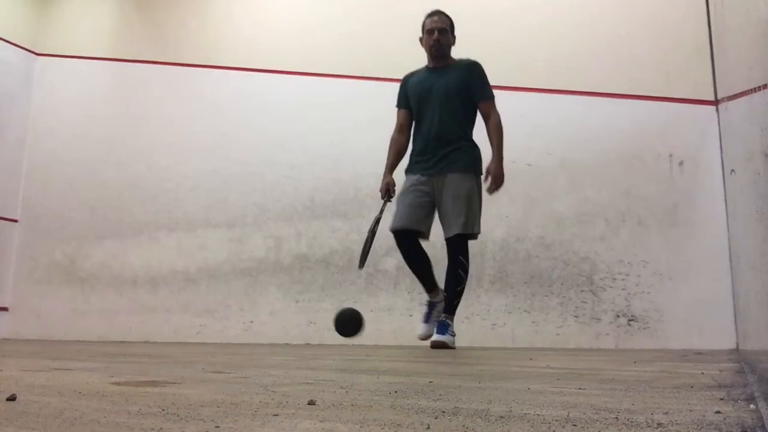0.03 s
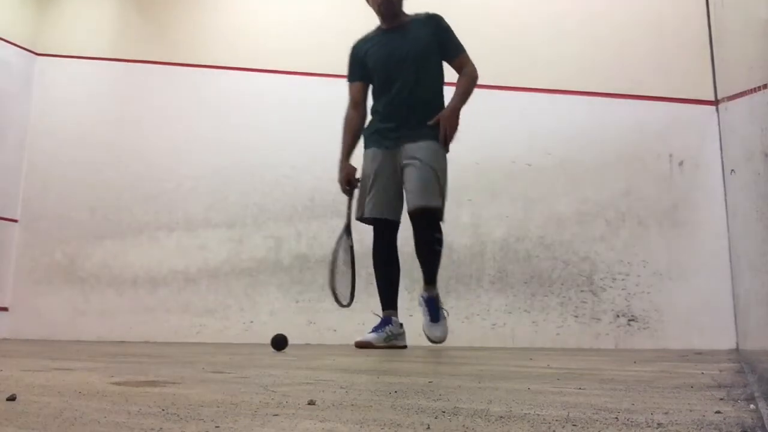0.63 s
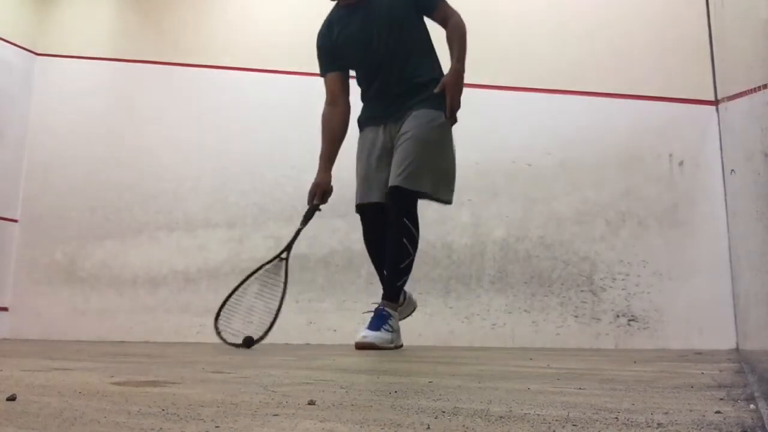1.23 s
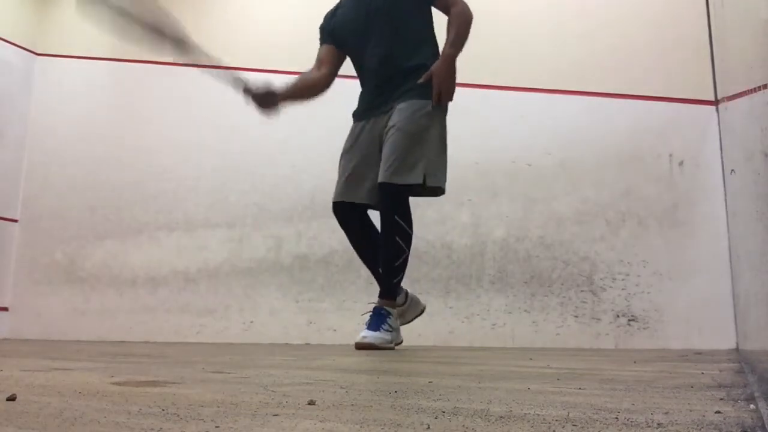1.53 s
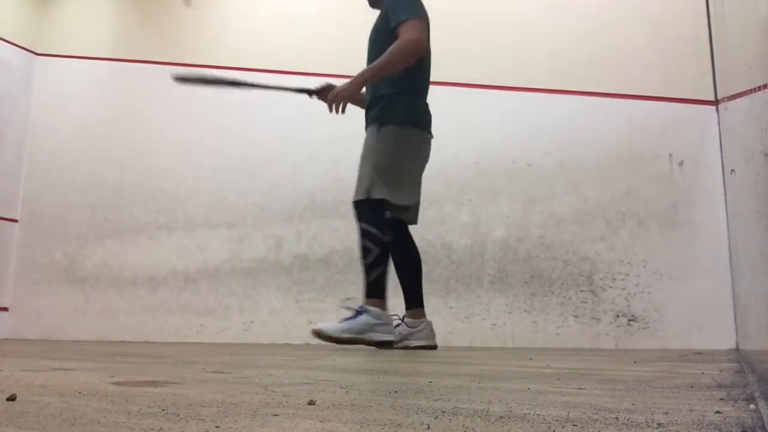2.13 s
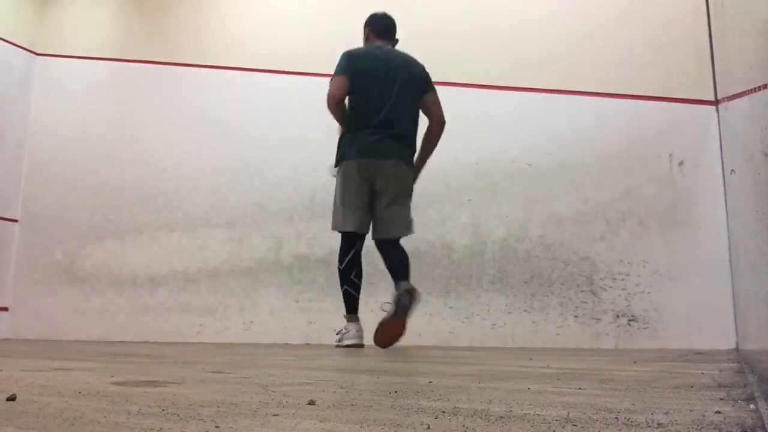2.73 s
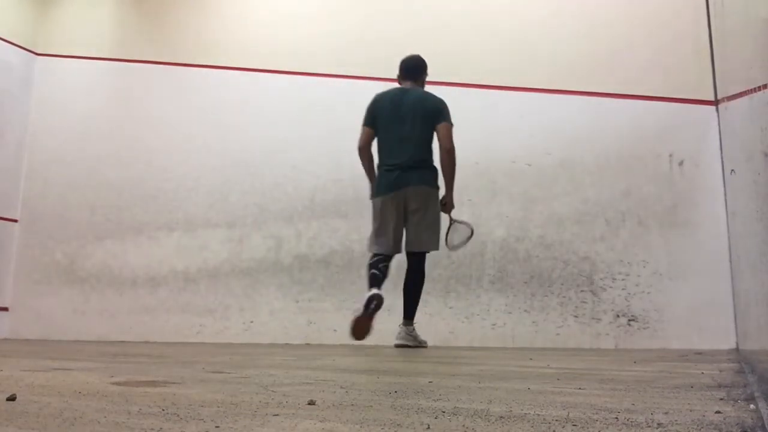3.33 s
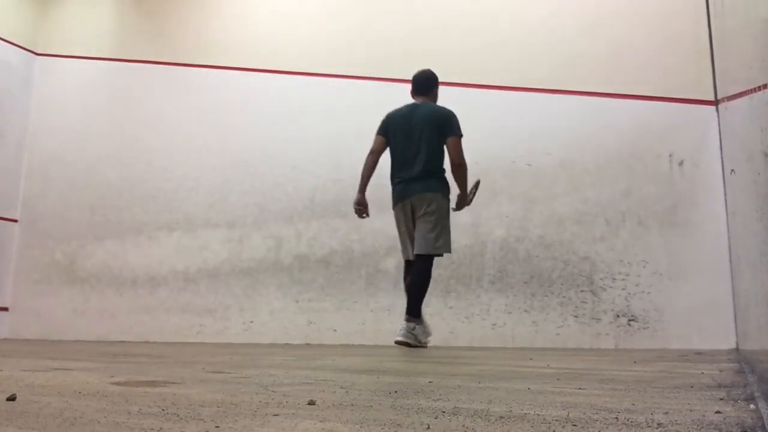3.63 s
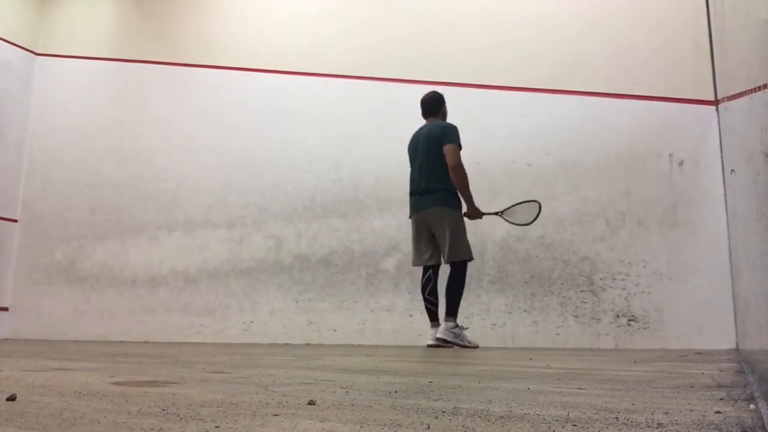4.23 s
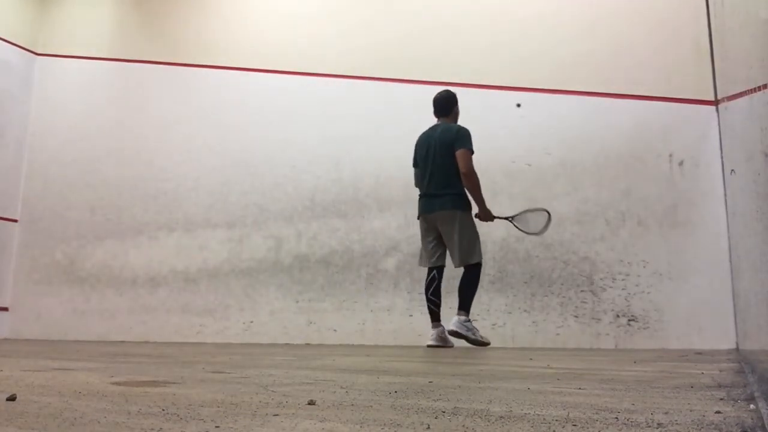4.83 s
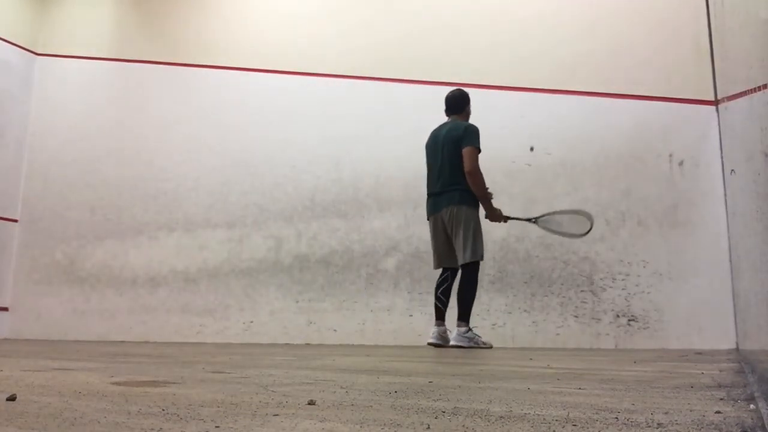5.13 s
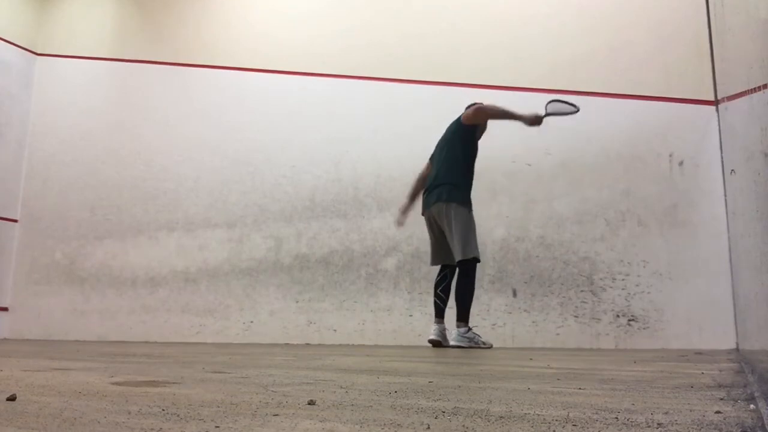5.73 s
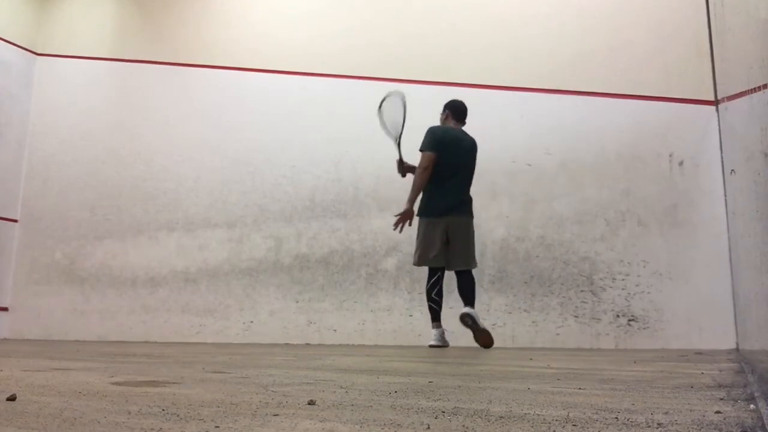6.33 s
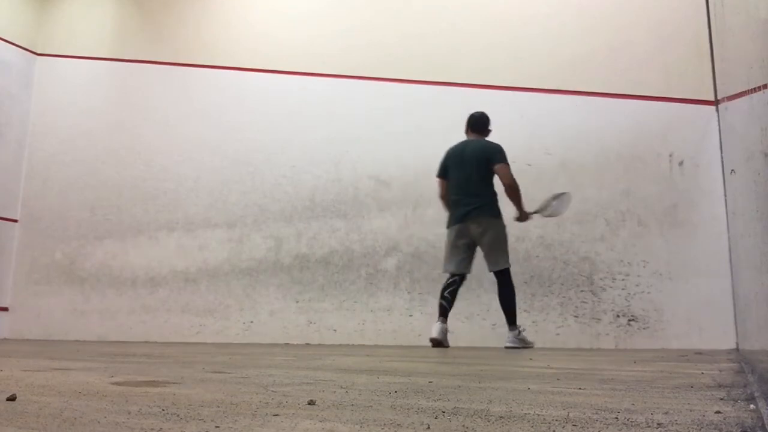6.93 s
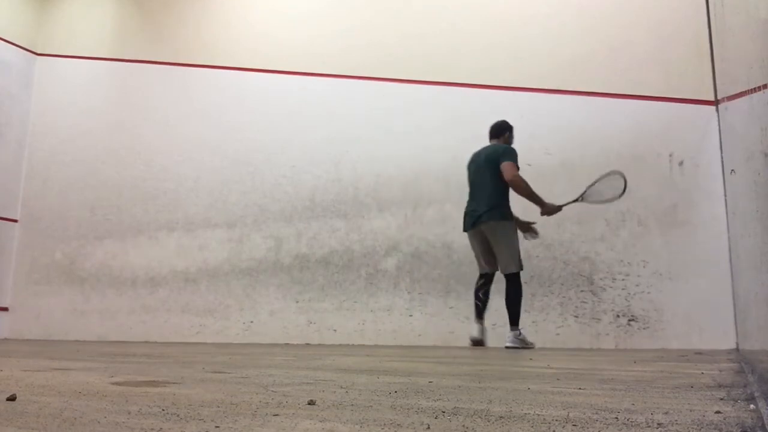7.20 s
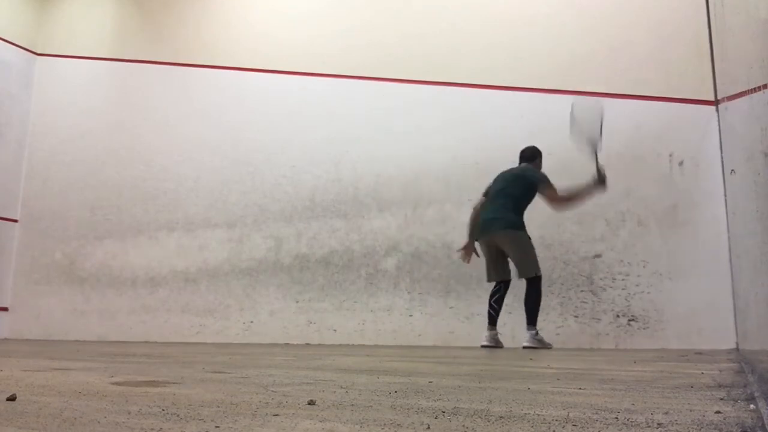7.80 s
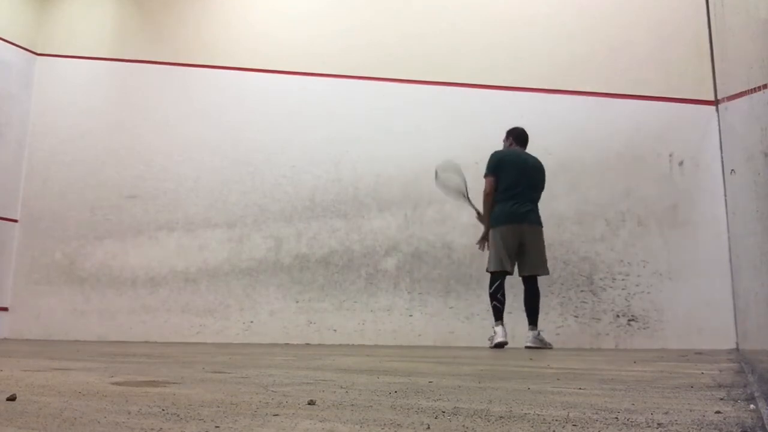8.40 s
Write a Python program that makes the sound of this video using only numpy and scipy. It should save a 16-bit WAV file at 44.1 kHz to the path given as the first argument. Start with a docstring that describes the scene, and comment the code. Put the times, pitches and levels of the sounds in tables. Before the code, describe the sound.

A squash player walks over a wooden floor, then hits two shots, each a bounce, racket stroke and loud, reverberant wall smack.

```python
"""A squash ball, driven twice by a player alone on a court: floor bounce, swish, racket, front wall.
Before the drives he scoops up the ball, walks, scuffs and squeaks a shoe. Impacts are short pulses
that excite damped modes of the ball's cavity, the strings and the sprung floor; sliding soles and the
swing are swells of noise. Bare walls return hard echoes, then a diffuse reverberation that hangs for
seconds in the middle range, over the faint steady air of the hall."""
import sys
import numpy as np
from scipy import signal
from scipy.fft import rfft, irfft
from scipy.io import wavfile
from scipy.ndimage import uniform_filter1d

SR = 44100
rng = np.random.default_rng(int(sys.argv[2]) if len(sys.argv) > 2 else 0)


def master(y):
    """Save y as 16-bit WAV."""
    cut = np.clip(np.atleast_2d(y).T, -1, 1)
    pcm = np.round(cut * 32767)  # scale
    wavfile.write(sys.argv[1], SR, pcm.astype(np.int16))


N = 377496
T = np.arange(N) / SR


def undb(db):
    """Amplitude ratio of a level in decibels."""
    return 10 ** (np.asarray(db) / 20)


def unit(x):
    """Normalisation to unit energy."""
    return x / np.sqrt(np.sum(x ** 2))


def along(points, hz):
    """Interpolation of (f, value) points on a logarithmic frequency axis."""
    f, value = np.transpose(points)
    return np.interp(np.log(np.maximum(hz, 1)), np.log(f), value)


def add(out, s, x):
    """Superposition of x on out from time s."""
    i = max(int(s * SR), 0)
    out[i:i + len(x)] += x[:N - i]


def late(x, ms):
    """Pure delay, cut to the length of x."""
    return np.r_[np.zeros(int(ms * SR / 1000)), x][:len(x)]


def blow(spectrum, tilt_db=0, pitch=1, size=4096):
    """Minimum phase: the most compact causal pulse with a given spectrum, tilted in dB per octave."""
    hz = np.maximum(np.fft.rfftfreq(size, 1 / SR), 1)
    db = along(spectrum, hz / pitch) + tilt_db * np.log2(np.maximum(hz, 200) / 1000)
    cepstrum = irfft(np.log(undb(db)))
    cepstrum[1:size // 2] *= 2  # fold onto positive time
    cepstrum[size // 2 + 1:] = 0
    return unit(irfft(np.exp(rfft(cepstrum)))[:size // 2])


# spectrum of the hall's air: f/Hz, level/dB
AIR_SPECTRUM = [(30, -21), (88, -0.5), (200, -6), (500, -14.5), (800, -19), (1400, -16.5), (1900, -24.5),
                (4200, -28), (5000, -31), (9000, -33), (10500, -36), (13000, -34), (15500, -41.5)]
def air(level_db=-63):
    """Stationary noise: the faint rumble and hiss of the hall."""
    return undb(level_db) * signal.fftconvolve(rng.standard_normal(N), blow(AIR_SPECTRUM), "same")


def arrival(db, spectrum):
    """Impulse response of one path to the listener, with a gain of db in the bass."""
    pulse = blow(spectrum, size=256)
    return undb(db) * pulse / pulse.sum()


# narrow peaks that give the reverberation a faint hollow ring: f/Hz, width/Hz, level/dB
TAIL_PEAKS = [(134, 20, 2), (386, 21, 3.5), (540, 26, 3), (721, 36, 3), (845, 33, 2.5), (1448, 22, 4),
              (1573, 19, 3.5), (1957, 44, 3.5)]
# reverberation time: f/Hz, T60/s
COURT_T60 = [(60, 1.86), (130, 1.57), (250, 2.35), (450, 3.76), (850, 4.35), (1600, 3.7), (2800, 3.16),
             (4200, 2.04), (7500, 1.36), (14000, 0.6)]
# response of the direct path: f/Hz, level/dB
DIRECT_PATH = [(1500, 0.5), (2800, 2.5), (4700, 2.5), (7000, -3.5), (15000, -3.5)]
# first reflections of a source beside the player: delay/ms, level/dB, extra treble/dB
NEAR_ECHOES = [(6, -10.5, -2), (21, -7, 8), (30.94, -9, 1), (53.8, -5, -2), (90.2, -8, -5)]
def court(count=17, size=140000, tail_db=-31, early_gain=0.43, early_s=0.091):
    """Diffuse field: bands of noise decay exponentially. Returns a function that sounds a source in it."""
    t = T[:size]
    hz = np.fft.rfftfreq(4 * size, 1 / SR)
    peaks_db = sum(db / (1 + (2 * (hz - f) / width) ** 2) for f, width, db in TAIL_PEAKS)
    noise = rfft(rng.standard_normal(4 * size)) * undb(peaks_db)
    centres = np.geomspace(60, 15000, count)
    bands = np.float32([irfft(noise * along(np.c_[centres, share], hz)) for share in np.eye(count)])
    # reflections thicken sooner in the treble than in the bass, and are strongest early on
    build_s = .028 * (1000 / centres[:, None]) ** 0.27
    swell = (1 - np.exp(-t / build_s)) * (1 + early_gain * np.exp(-t / early_s))
    decay = np.exp(-np.log(1000) * t / along(COURT_T60, centres)[:, None])
    envelopes = np.float32(undb(tail_db) * swell * decay)
    plaster = signal.butter(1, 9300, fs=SR)  # the walls absorb treble
    # early reflections arrive in separate clumps before they merge
    clump_db, clump_s, merge_s = 5, .002, .1
    clumps = uniform_filter1d(rng.standard_normal(4 * size), int(clump_s * SR))
    clumps /= clumps.std()
    depth = np.log(undb(clump_db)) * np.exp(-t / merge_s)

    def room(x, direct_db=0, echoes=NEAR_ECHOES, diffuse=None, rise_s=1 / SR):
        """Multipath: x arrives directly and as echoes; diffuse (x by default) excites the tail."""
        spot = rng.integers(3 * size)  # every position has its own tail
        tail = signal.lfilter(*plaster, np.einsum("bt,bt->t", bands[:, spot:spot + size], envelopes))
        tail *= np.exp(depth * clumps[spot:spot + size] - depth ** 2)
        tail *= np.minimum(t / rise_s, 1) ** 2
        out = signal.fftconvolve(x if diffuse is None else diffuse, tail)
        paths = np.zeros(SR // 3)
        add(paths, 0, arrival(direct_db, DIRECT_PATH))
        for ms, db, treble_db in echoes:
            add(paths, ms / 1000, arrival(db, [(3600, 0), (6600, treble_db)]))
        add(out, 0, signal.fftconvolve(x, paths))
        return out
    return room


# spectrum of a light touch of the ball: f/Hz, level/dB
TAP_SPECTRUM = [(60, -12.5), (200, -1), (400, -2), (650, -10), (900, -10.5), (1300, -1.5), (1800, -12.5),
                (2500, -20.5), (5000, -28), (14000, -35)]
# touches: t/s, level/dB, tilt/(dB/octave), direct gain/dB
BALL_TAPS = [(.02, -12.5, -5.5, 0), (1.7290, -17.5, -0.97, 7)]
def taps(room):
    """Impulse excitation: each light touch of the ball sends one pulse into the court."""
    out = np.zeros(N)
    for s, db, tilt_db, direct_db in BALL_TAPS:
        add(out, s, undb(db) * room(blow(TAP_SPECTRUM, tilt_db), direct_db))
    return out


# spectrum of a soft blow on the boards: f/pitch, level/dB
THUD_SPECTRUM = [(.15, -46), (.3, -23), (.6, -6), (.85, -3), (1.1, 2), (1.4, -5), (2.5, -22.5), (5, -40),
                 (14, -55), (60, -74)]
def knock(hz, decay_cycles=0.85, ring_db=1, swell_cycles=0.69):
    """Heavy damping: a soft blow sets the boards ringing for a few cycles, just above its pitch."""
    thud = blow(THUD_SPECTRUM, pitch=hz)
    cycles = 1.095 * hz * T[:len(thud)]
    envelope = np.exp(-cycles / decay_cycles) * (1 - np.exp(-cycles / swell_cycles))
    boards = unit(np.sin(2 * np.pi * cycles) * envelope)
    return unit(thud + undb(ring_db) * boards)


def floor_boom(hz=78, t60=2, db=-11.5, swell_s=.04):
    """Fundamental mode: the whole sprung floor swings up slowly and rings on after a blow."""
    envelope = (1 - np.exp(-T / swell_s)) * np.exp(-np.log(1000) * T / t60)
    return undb(db) * unit(np.sin(2 * np.pi * hz * T) * envelope)[:2 * SR]


# footsteps and, at 1.733 s, the low thud under the light touch of the ball:
# t/s, first level/dB, second level/dB, first f/Hz, delay of the second blow/s
FLOOR_THUDS = [(.123, -16.5, -13, 112, .08), (.962, -20, -22, 175, .08), (1.733, -17.5, -22, 140, .08),
               (1.93, -19, -16, 216, .06), (2.627, -25, -17.5, 194.7, .065),
               (3.114, -15.5, -15, 180.6, .085), (3.803, -19, -15.5, 159, .094),
               (4.192, -18, -21.5, 189, .028), (4.965, -14, -18, 178, .08), (6.8, -17.5, -17.5, 176, .08),
               (7.31, -13.5, -9, 150, .08)]
def floor_thuds(room, second_ratio=0.748):
    """Double impact, in a step the heel, then the lower-pitched sole; both drive the floor mode."""
    out, boom = np.zeros(N), floor_boom()
    for s, first_db, second_db, hz, gap_s in FLOOR_THUDS:
        add(out, s, undb(first_db) * room(knock(hz), direct_db=1.5))
        add(out, s + gap_s, undb(second_db) * room(knock(hz * second_ratio), direct_db=1))
        add(out, s, np.hypot(undb(first_db), undb(second_db)) * boom)
    return out


def rattle(decay_s, chatter_gain, size=2048):
    """Contact chatter: an impulse followed by exponentially decaying noise."""
    contact = chatter_gain * unit(rng.standard_normal(size) * np.exp(-T[:size] / decay_s))
    contact[0] += 1
    return unit(contact)


# spectrum of a hard click: f/pitch, level/dB
CLICK_SPECTRUM = [(.5, -26), (.75, -2), (1.2, -1.5), (1.55, -13.5), (3, -25.5), (8, -50)]
def click(room, db, hz, direct_db, echoes=NEAR_ECHOES):
    """Hard contact: a short pulse centred near hz, drawn out by chatter."""
    pulse = blow(CLICK_SPECTRUM, pitch=hz)
    chatter = signal.fftconvolve(pulse, rattle(decay_s=0.0061, chatter_gain=4.3))
    return undb(db) * room(chatter, direct_db, echoes, pulse)


# lone clicks: t/s, level/dB, f/Hz
LONE_CLICKS = [(.373, -49.5, 5470), (1.247, -36, 1290), (2.1155, -31, 3520), (2.225, -41, 4680),
               (2.325, -40, 3300), (2.715, -45.5, 3500), (2.991, -44.5, 1990), (3.191, -38.5, 3230),
               (5.126, -37.5, 1870)]
def lone_clicks(room):
    """Small hard impacts of racket frame and soles, with a strong direct path."""
    out = np.zeros(N)
    for s, db, hz in LONE_CLICKS:
        add(out, s, click(room, db, hz, direct_db=12))
    return out


def rub(room, spectrum, length_s, tilt_db=0, pitch=1, direct_db=0, grain_db=4):
    """Random excitation: a swell of dense uneven grains that fills the court gradually."""
    n = int(length_s * SR)
    pulse = blow(spectrum, tilt_db, pitch)
    noise = rng.standard_normal(N)[:n]
    roughness = undb(grain_db * rng.standard_normal(N)[:n])
    swell = unit(signal.fftconvolve(noise * roughness * np.hanning(n), pulse))
    return room(swell, direct_db, diffuse=pulse, rise_s=length_s)


# spectrum of a sliding sole: f/Hz, level/dB
SOLE_SPECTRUM = [(100, -3.5), (500, 3.5), (900, -9.5), (1400, 3), (2200, -10.5), (3000, -17), (4000, -19),
                 (6000, -27.5), (8500, -20), (11000, -28), (15000, -35)]
# scuffs: t/s, level/dB, duration/s, tilt/(dB/octave), frequency ratio
SOLE_SCUFFS = [(.5, -15, 0.073, -1.5, 1), (0.957, -32.5, .03, 2.5, 0.99), (2.68, -33.5, .09, -0.5, 1.15),
               (3.099, -35, 0.088, 3, 1), (3.24, -32.5, 0.074, -1, 0.87), (3.92, -29, 0.11, -1, 1.19),
               (4.182, -34, 0.042, 4.5, 1), (7.278, -33, .1, 3, 0.95)]
def scuffs(room):
    """Sliding friction: soles rub over the boards in short bursts of noise."""
    out = np.zeros(N)
    for s, db, length_s, tilt_db, pitch in SOLE_SCUFFS:
        add(out, s, undb(db) * rub(room, SOLE_SPECTRUM, length_s, tilt_db, pitch))
    return out


# racket head against the floor: t/s, level/dB, f/Hz, direct gain/dB
SCOOP_KNOCKS = [(1.189, -9, 256, 6), (1.275, -11, 120, -1), (1.322, -5.5, 200, -2)]
def scoop(room):
    """Damped vibration of the boards, knocked by the racket as it scoops up the ball."""
    out = np.zeros(N)
    for s, db, hz, direct_db in SCOOP_KNOCKS:
        boards = knock(hz, decay_cycles=1.45, ring_db=3.0, swell_cycles=0.79)
        add(out, s, undb(db) * room(boards, direct_db))
    return out


# spectrum of a skidding sole: f/Hz, level/dB
SKID_SPECTRUM = [(900, -17), (2200, 0), (2900, -7), (6500, -2), (9000, -13), (15000, -24)]
def squeak(room, s=4.236, db=-17, hz=4160, octave_db=-26, grip_s=.01, wobble=.003):
    """Stick-slip: a rubber sole skids, then grips with a brief tone heard only as reverberation."""
    out, n = np.zeros(N), int(grip_s * SR)
    skid = rub(room, SKID_SPECTRUM, length_s=0.075, direct_db=7.5)
    add(out, s - .054, undb(db - 12) * skid)
    drift = uniform_filter1d(rng.standard_normal(N), size=80)
    slip_hz = hz * (1 + wobble * drift[:n] / drift.std())
    phase = 2 * np.pi * np.cumsum(slip_hz) / SR
    tone = np.sin(phase) + undb(octave_db) * np.sin(2 * phase)
    grip = unit(tone * signal.windows.tukey(n, .5))
    add(out, s, undb(db) * room(np.zeros(1), diffuse=grip))
    return out


def flutter(trip_ms=29.5, first_db=-1.1, loss_db=0.86, treble_db=-9, count=7):
    """Flutter echo: sound runs between floor and ceiling, a little weaker on every round trip."""
    return [((k + 1) * trip_ms, first_db - k * loss_db, treble_db) for k in range(count)]


# spectrum of the ball on the sprung floor: f/Hz, level/dB
BOUNCE_SPECTRUM = [(45, -19.5), (95, -4.5), (128, 1.5), (185, 1.1), (300, -9.5), (450, -19.5), (700, -26.5),
                   (1100, -23.5), (1500, -22), (2600, -38.5), (4200, -40.5), (6000, -52), (14000, -73)]
# bounces: t/s, level/dB, tilt/(dB/octave), direct gain/dB, relative click level/dB
FLOOR_BOUNCES = [(5.6555, 3, -.5, 0, -37.5), (7.3675, 6.5, -1.34, 2.5, -47)]
def bounces(room, sideways_db=-4.5, release_s=.005):
    """Directional radiation: boards struck by the ball radiate mostly upwards, less to the sides."""
    out = np.zeros(N)
    for s, db, tilt_db, direct_db, click_db in FLOOR_BOUNCES:
        thump = blow(BOUNCE_SPECTRUM, tilt_db)
        boards = unit(signal.fftconvolve(thump, rattle(decay_s=.004, chatter_gain=0.3)))
        add(out, s, undb(db) * room(undb(sideways_db) * boards, direct_db, flutter(), thump))
        for after_s in (0, release_s):  # the ball clicks on landing and again on leaving
            add(out, s + after_s, click(room, db + click_db, hz=3300, direct_db=15))
        add(out, s, undb(db) * floor_boom())
    return out


# spectrum of the swish: f/Hz, level/dB
SWISH_SPECTRUM = [(200, -4), (1500, 2.5), (4000, -2), (8000, -11), (15000, -20)]
# swings: t/s, level/dB, duration/s
SWINGS = [(6.083, -20, 0.074), (7.942, -20, 0.061)]
def swishes(room):
    """Turbulence: the racket cuts the air just before each stroke."""
    out = np.zeros(N)
    for s, db, length_s in SWINGS:
        add(out, s, undb(db) * rub(room, SWISH_SPECTRUM, length_s))
    return out


def ring(hz, t60, db, size=2048):
    """Free vibration of one damped mode."""
    t = T[:size]
    return undb(db) * unit(np.sin(2 * np.pi * hz * t) * np.exp(-np.log(1000) * t / t60))


def cavity():
    """Cavity resonance of the air in the hollow ball."""
    return ring(hz=463, t60=0.026, db=-11.5)


def slap(pulse, gap_ms, split_hz=1700, soft_hz=5000, lag_ms=0.94, crack_db=4.3):
    """Elastic impact: the ball cracks, pops and rings as it flattens, then cracks as it springs back."""
    body = signal.sosfilt(signal.butter(3, split_hz, "low", fs=SR, output="sos"), pulse)
    treble = signal.sosfilt(signal.butter(3, split_hz, "high", fs=SR, output="sos"), pulse)
    crack = undb(crack_db) * signal.lfilter(*signal.butter(1, soft_hz, fs=SR), treble)
    return crack + late(0.88 * body + cavity(), lag_ms) + 0.63 * late(crack, gap_ms)


# spectrum of the strings on the ball: f/Hz, level/dB
STROKE_SPECTRUM = [(60, -16), (120, -10), (230, -1), (400, -1), (520, -0.2), (630, -10.5), (850, -5.5),
                   (1100, -8.5), (1450, -8.5), (2500, -25.5), (4000, -24), (7000, -32.5), (15000, -38.5)]
# modes of the string bed: f/Hz, T60/s, level/dB
STRING_BED = [(530, .06, -7), (1290, 0.03, -8.5)]
# reflections of the frame's snap off nearby walls: delay/ms, level/dB, extra treble/dB
SNAP_ECHOES = [(20.6, 7, 2), (24.1, 0, 2)]
# strokes: t/s, level/dB, tilt/(dB/octave), direct gain/dB, crack spacing/ms, side wall echo level/dB
STROKES = [(6.1325, 4, -.8, -2.5, 3, -3), (7.9915, 3.5, -0.75, 1.5, 4, -2.5)]
def drives(room, side_wall_ms=48.5):
    """Modal excitation: the string bed rings briefly and the frame snaps as the racket takes the ball."""
    out = np.zeros(N)
    for s, db, tilt_db, direct_db, gap_ms, side_db in STROKES:
        pulse = blow(STROKE_SPECTRUM, tilt_db)
        stroke = unit(signal.fftconvolve(slap(pulse, gap_ms), rattle(decay_s=0.0047, chatter_gain=2.4)))
        for mode in STRING_BED:
            add(stroke, gap_ms / 1000, ring(*mode))
        echoes = NEAR_ECHOES + [(side_wall_ms, side_db, -3)]
        add(out, s, undb(db) * room(unit(stroke), direct_db, echoes, pulse))
        snap = click(room, db - 22.5, hz=5000, direct_db=3.4, echoes=SNAP_ECHOES)
        add(out, s, snap)
    return out


# spectrum of the ball's first contact with the wall: f/Hz, level/dB
CRACK_SPECTRUM = [(800, -13), (1400, 6.5), (2000, 1.5), (2800, -9), (4800, -12.5), (7000, -18),
                  (15000, -29.5)]
def smack(gap_ms, pop_hz=500, pop_s=0.00068, crack_db=-8.5, reflection=0.78, size=2048):
    """Impact and reflection: the ball cracks, pops and rings; the nearest surface doubles the sound."""
    t = T[:size]
    pop = unit(np.gradient(np.sin(2 * np.pi * pop_hz * t) * t * np.exp(-t / pop_s)))
    pulse = pop + undb(crack_db) * blow(CRACK_SPECTRUM) + cavity()
    return unit(pulse + reflection * late(pulse, gap_ms))


# spectrum that a wall hit feeds into the reverberation: f/Hz, level/dB
WALL_SPECTRUM = [(60, -26), (120, -15), (250, -1.7), (400, .5), (520, -3), (620, -7), (820, -2), (940, -6),
                 (1060, -16), (1220, -13), (1480, -8), (2000, -14), (2800, -23), (4000, -24.5),
                 (7000, -30.5), (15000, -36)]
# first reflections, one list for each hit: delay/ms, level/dB, extra treble/dB
FRONT_WALL_ECHOES = [
    [(9.37, -1, -1), (18.87, -7, 0), (27.7, -11, 5), (31.5, -10, 4), (36.05, -5, -8), (53.2, -7, -7),
     (57.3, -7, -10), (62.4, -9, -2), (65.9, -4, -8)],
    [(10.27, -1.5, -1), (18.1, -8, 0), (28.58, -1.5, 0), (35.15, -10, 0), (39.4, -5, -9), (53.5, -9, -5),
     (63.2, -7, -6), (69, -3.5, -12), (81, -8, -4)],
]
# hits: t/s, level/dB, reverberation tilt/(dB/octave), direct gain/dB, crack spacing/ms
FRONT_WALL_HITS = [(6.3861, 10.7, 0.16, 1, 2.23), (8.2410, 11, 0.26, -0.5, 1.138)]
def wall_hits(room, beam_db=-8.5, beam_hz=3260):
    """Directivity: the smack fills the court, but its sharpest part beams straight back without echoes."""
    out = np.zeros(N)
    sharp = blow(CLICK_SPECTRUM, pitch=beam_hz)
    for (s, db, tilt_db, direct_db, gap_ms), echoes in zip(FRONT_WALL_HITS, FRONT_WALL_ECHOES):
        add(out, s, undb(db) * room(smack(gap_ms), direct_db, echoes, blow(WALL_SPECTRUM, tilt_db)))
        beam = unit(sharp + 0.93 * late(sharp, gap_ms))
        add(out, s, undb(db + beam_db) * beam)
    return out


def scene():
    """Superposition: ball, racket and player share one court."""
    room = court()
    ball = taps(room) + bounces(room) + drives(room) + wall_hits(room)
    player = scoop(room) + lone_clicks(room) + floor_thuds(room) + scuffs(room) + swishes(room)
    return (ball + player + squeak(room) + air())[None]


def record(dry, ceiling=0.54, low_hz=55, top_hz=15900, start_s=.119, fade_s=0.0044):
    """Band limiting and saturation: after a moment of silence the sound enters, its peaks rounded."""
    thin = signal.sosfilt(signal.butter(6, low_hz, "high", fs=SR, output="sos"), dry)
    fade_in = np.clip((T - start_s) / fade_s, 0, 1)
    rounded = ceiling * np.tanh(thin * fade_in / ceiling)
    return signal.sosfilt(signal.ellip(10, .2, 80, top_hz, fs=SR, output="sos"), rounded)


dry = scene()
out = record(dry)
master(out)
```